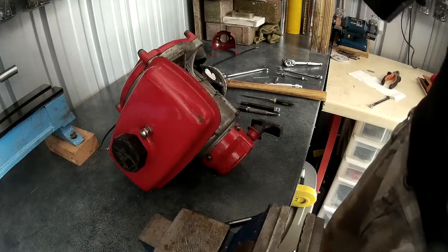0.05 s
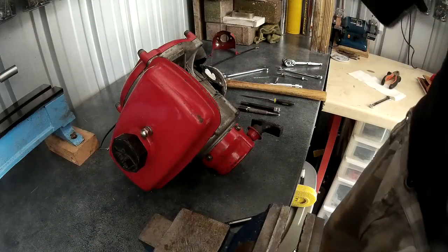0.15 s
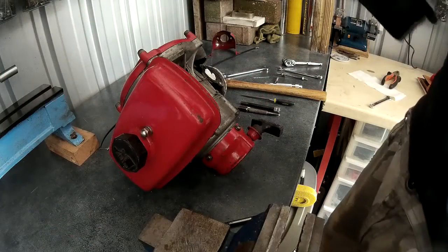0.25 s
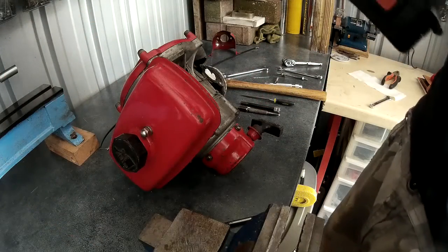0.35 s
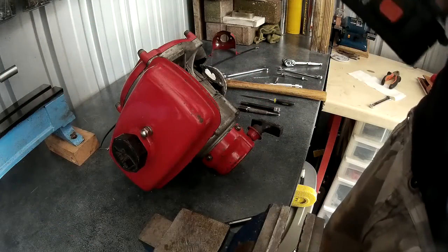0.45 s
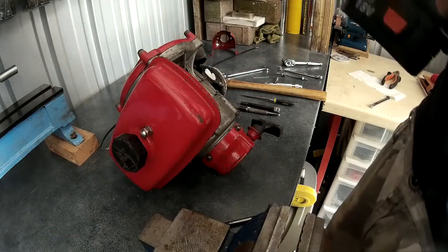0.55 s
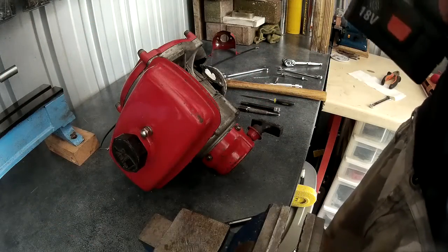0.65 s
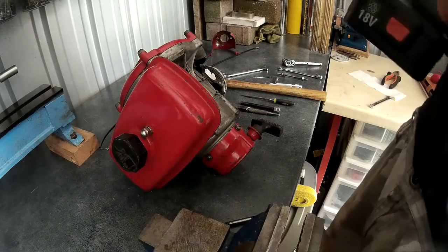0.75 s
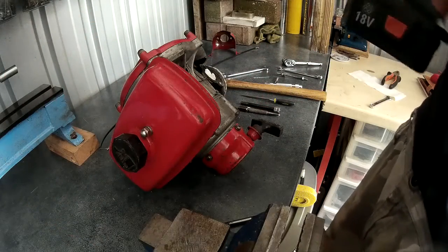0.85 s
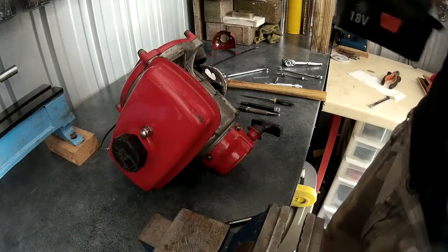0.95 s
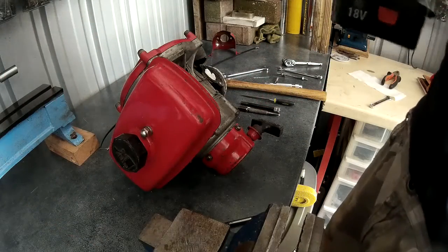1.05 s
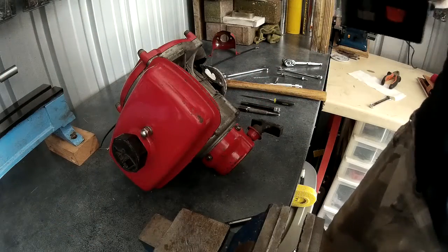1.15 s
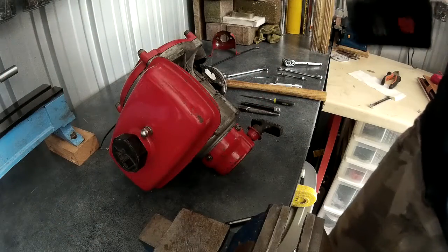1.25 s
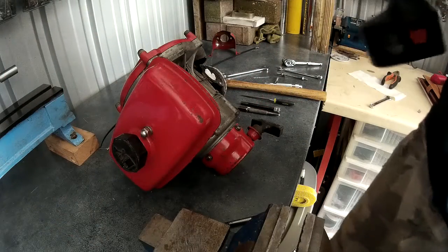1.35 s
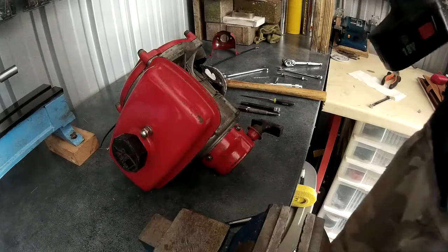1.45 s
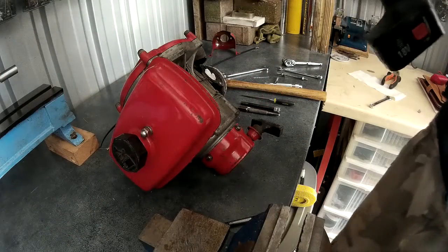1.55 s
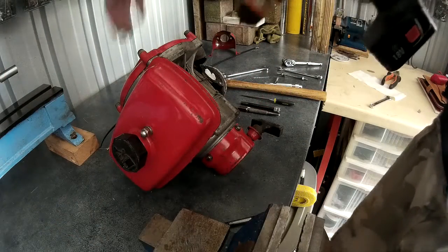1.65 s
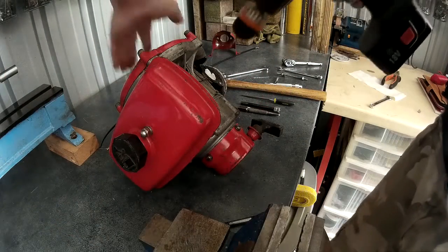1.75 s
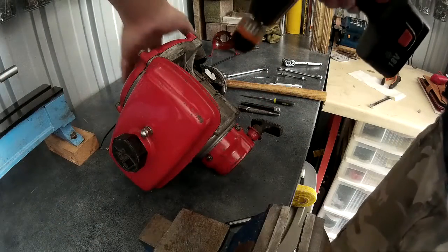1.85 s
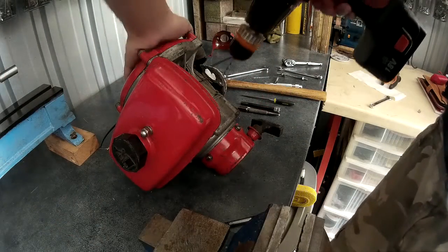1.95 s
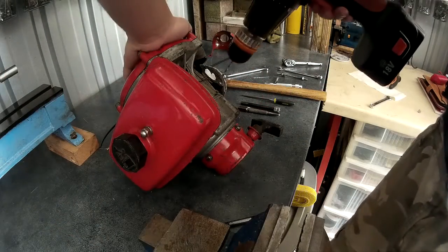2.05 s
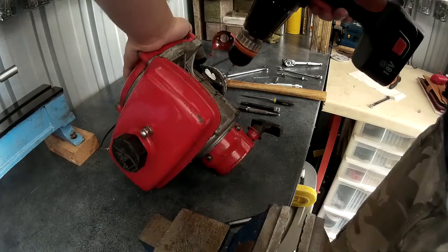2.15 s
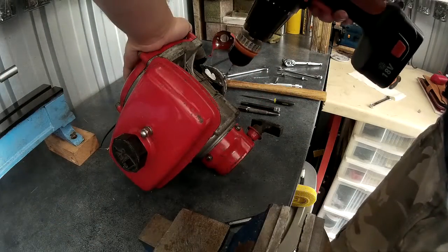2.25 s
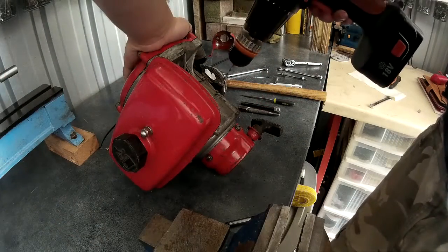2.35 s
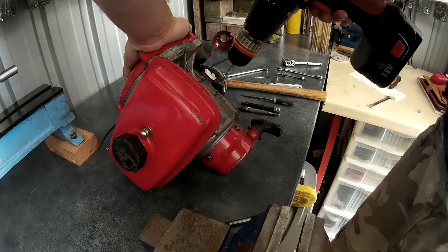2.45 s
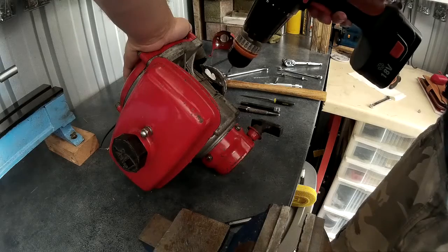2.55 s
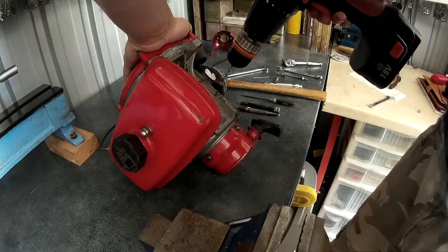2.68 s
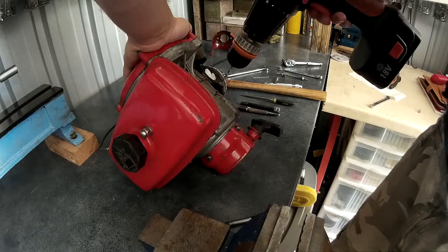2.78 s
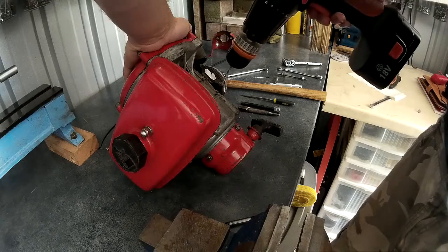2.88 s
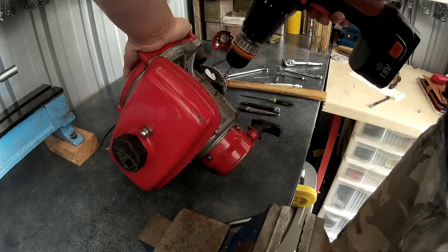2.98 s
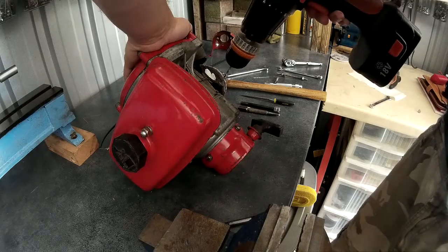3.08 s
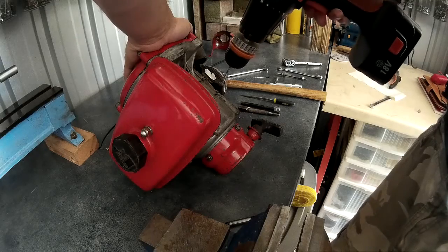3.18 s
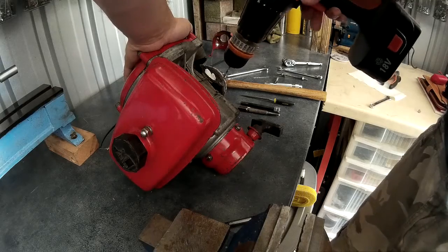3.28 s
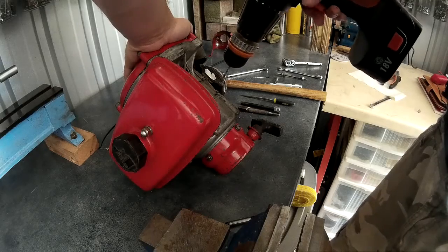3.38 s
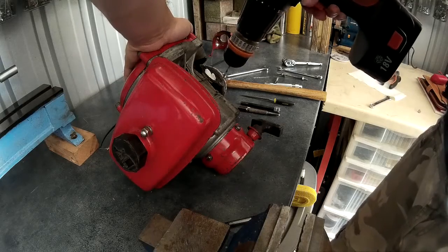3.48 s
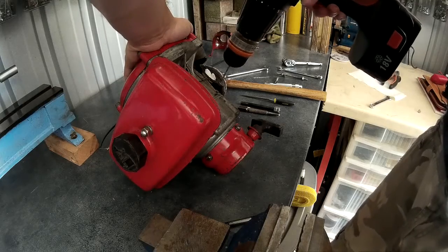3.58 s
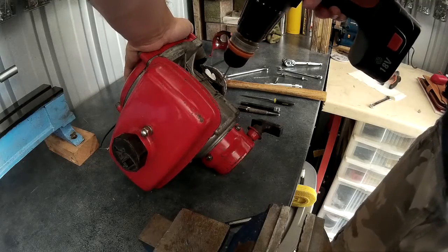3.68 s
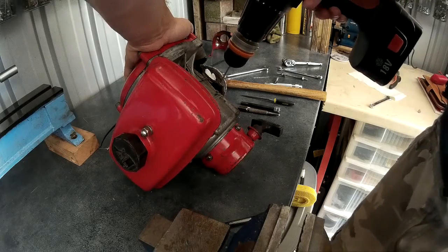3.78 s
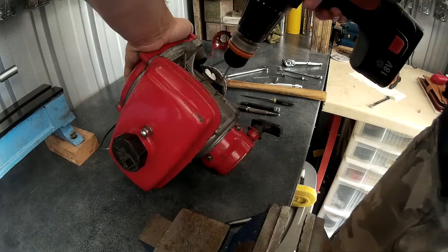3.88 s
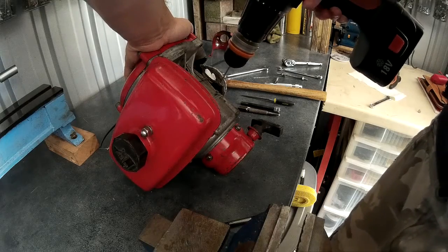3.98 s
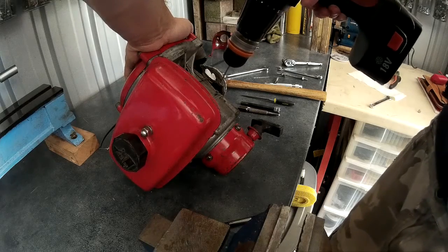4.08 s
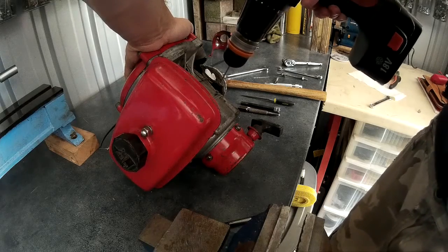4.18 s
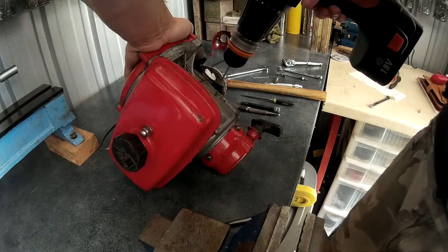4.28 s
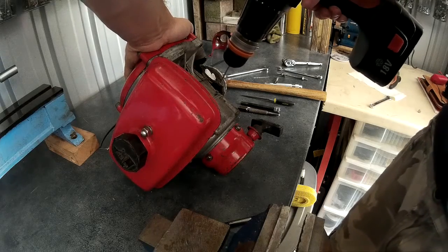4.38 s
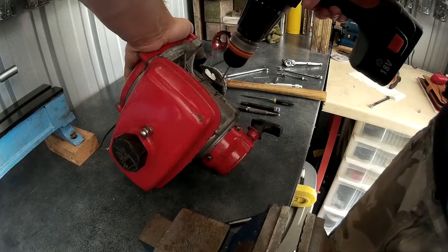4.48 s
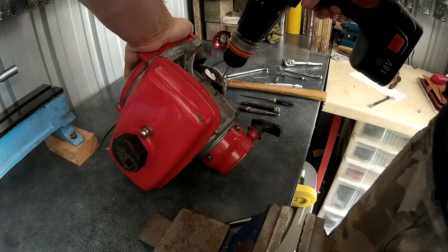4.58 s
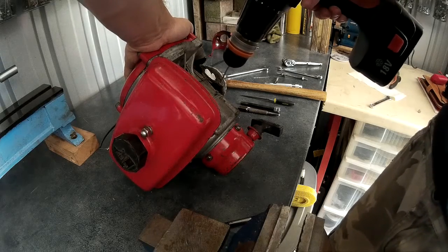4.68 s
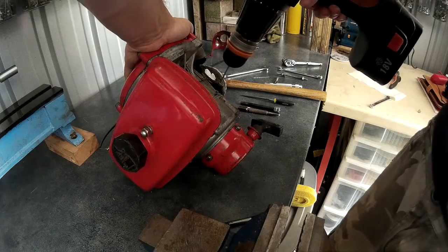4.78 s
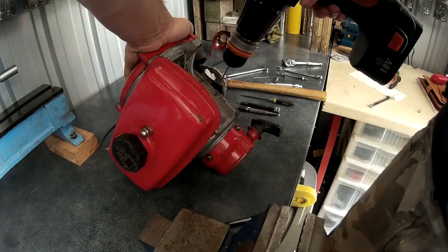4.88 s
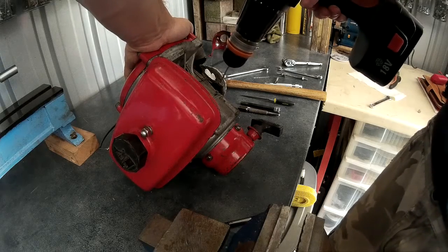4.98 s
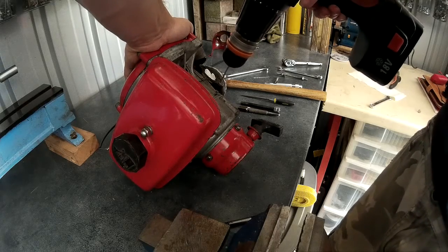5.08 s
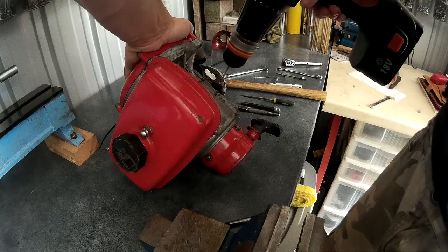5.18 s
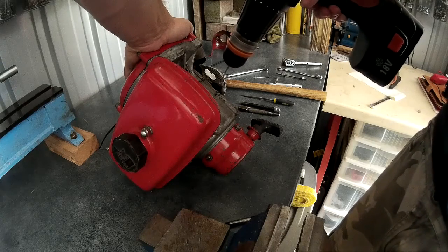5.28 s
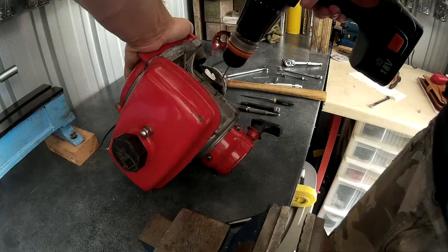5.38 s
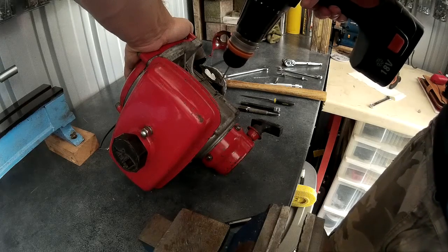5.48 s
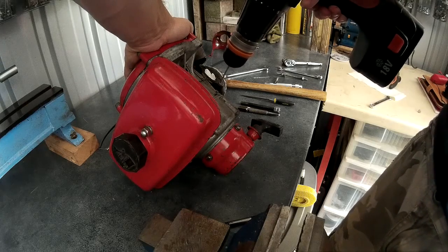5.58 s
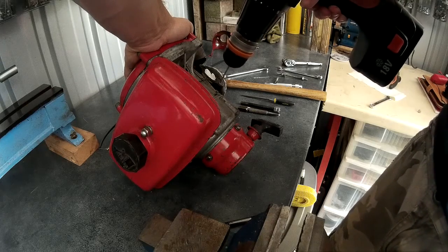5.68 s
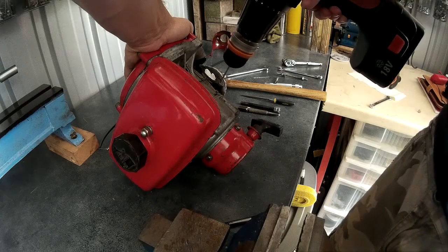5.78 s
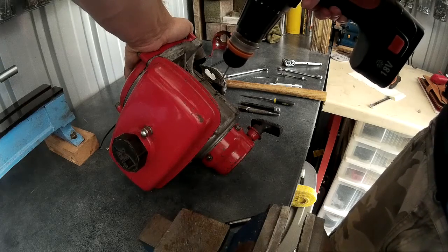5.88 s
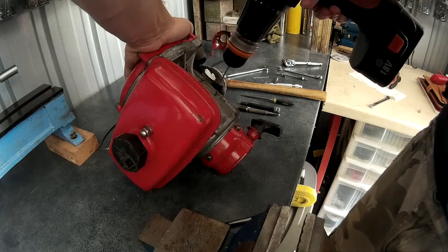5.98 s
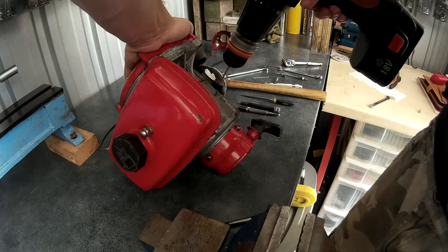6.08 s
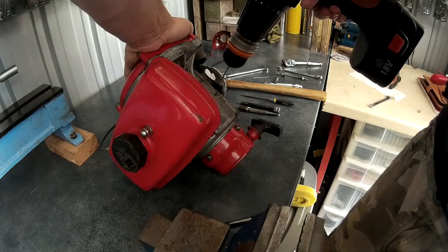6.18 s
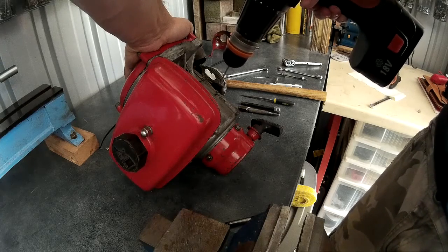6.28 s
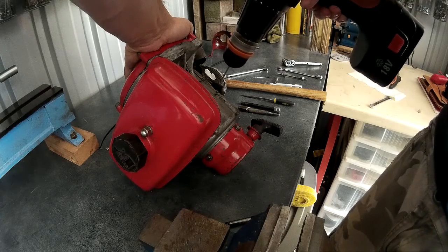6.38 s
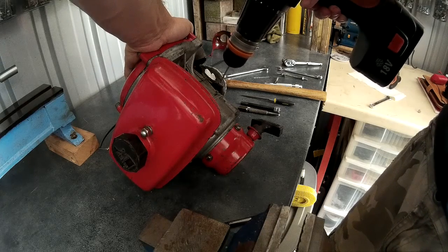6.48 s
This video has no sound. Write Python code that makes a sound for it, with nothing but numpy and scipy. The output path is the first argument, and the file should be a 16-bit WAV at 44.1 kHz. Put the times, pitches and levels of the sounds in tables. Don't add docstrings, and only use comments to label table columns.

```python
import sys
import numpy as np
from scipy import signal
from scipy.fft import rfft, irfft, next_fast_len
from scipy.io import wavfile
from scipy.ndimage import uniform_filter1d, map_coordinates

SR = 44100
rng = np.random.default_rng(int(sys.argv[2]) if len(sys.argv) > 2 else 0)


def nominal_scale(level):
    x = np.asarray(level, float) / 20
    return 10 ** x


def transcribe(signal):
    frames = np.atleast_2d(signal).T
    limited = np.clip(frames, -1, 1)
    pcm = np.round(limited * 32767).astype(np.int16)
    wavfile.write(sys.argv[1], SR, pcm)


N = 288369
TIME = np.arange(N) / SR
TRIGGER_S = 3.535
CRUISE = 13.23


def unit_rms(x):
    return x / np.sqrt(np.mean(x ** 2) + 1e-20)


def coloured(x, points, rings=(), ring_db=0):
    size = next_fast_len(len(x))
    hz = np.fft.rfftfreq(size, 1 / SR)
    point_hz, db = np.transpose(points)
    power = nominal_scale(2 * np.interp(np.log(hz + 1), np.log(point_hz), db, -90, -90))
    for centre, width, top_db in rings:
        power = power + nominal_scale(2 * (top_db + ring_db)) / (1 + (2 * (hz - centre) / width) ** 2) ** 2
    return unit_rms(irfft(rfft(x, size) * np.sqrt(power), size)[:len(x)])


def wander(rate_hz):
    knots = rng.standard_normal(int(N / SR * rate_hz) + 3)
    return map_coordinates(knots, [TIME * rate_hz], order=3)


def add(mix, s, sound):
    part = mix[max(round(s * SR), 0):][:len(sound)]
    part += sound[:len(part)]


def band(x, hz, width):
    shape = signal.iirpeak(np.clip(hz, 50, 15000), max(hz / width, .3), SR)
    once = signal.lfilter(*shape, x)
    return unit_rms(signal.lfilter(*shape, once))


def swell(s, length, rise, fall):
    return np.clip(np.minimum((TIME - s) / rise, (s + length - TIME) / fall), 0, 1)


def worn(turn, share):
    teeth = rng.standard_normal(4096)
    again = teeth[(turn % 1 * len(teeth)).astype(int)]
    return np.sqrt(share) * again + np.sqrt(1 - share) * rng.standard_normal(N)


# time in seconds, speed in turns per second.
SPINDLE_SPEED = [(3.55, 5.0), (3.6, 8.929), (3.65, 11.081), (3.7, 11.917), (3.76, 12.376), (3.9, 13.477),
                 (4.0, 13.531), (4.2, 13.374), (4.4, 13.383), (4.8, 13.221), (5.2, 13.21), (5.5, 13.26),
                 (6.2, 13.22), (6.54, 13.17)]
# time in seconds, load from 0 to 1.
BIT_LOAD = [(3.535, 0.45), (3.95, 0), (4.1, 0.45), (4.35, 0.46), (4.7, 0.66), (4.9, 0.9), (5.15, 0.86),
            (5.4, .85), (5.65, .8), (5.9, 0.83), (6.54, 0.93)]
# level in dB at full speed unloaded, dB gained at full load, power of speed.
MESH_LEVEL = (-22.5, 5.87, 1)
CLATTER_LEVEL = (-30, 2.3, 4.35)
HISS_LEVEL = (-43.5, 1.4, 5.5)


def drill():
    start_s, start_speed = SPINDLE_SPEED[0]
    speed = np.interp(TIME, *np.transpose(SPINDLE_SPEED)) * (TIME > start_s)
    turn = np.cumsum(speed) / SR
    load = np.clip(np.interp(TIME, *np.transpose(BIT_LOAD)), 0, 1)
    light = 1 - load
    slow_db = 20 * np.log10(np.maximum(speed, start_speed) / CRUISE)

    def level_db(law):
        db, load_db, power = law
        return db + load_db * load + power * slow_db

    catch_db = -52 * np.clip(1 - (TIME - TRIGGER_S) / 0.037, 0, 1)
    bite_db = 2.5 * np.exp(-((TIME - 3.735) / .04) ** 2)
    mesh_db = level_db(MESH_LEVEL) + catch_db
    clatter_db = level_db(CLATTER_LEVEL) + bite_db
    hiss_db = level_db(HISS_LEVEL) + 0.63 * bite_db

    heavy = 2 * np.pi * (turn - .528)
    binds = np.tanh(2 * np.cos(heavy - .3))
    drift = np.array([wander(4.01), wander(6.0), wander(7.6), wander(5.5)])
    low = nominal_scale(-1.17 + 2.3 * slow_db) * gear_mesh(speed, heavy, binds, light, drift)
    low = low + nominal_scale(-7.0) * growl(turn, binds)
    low = low + nominal_scale(19.5) * locked_tones(speed, turn, heavy, light, slow_db, drift)
    low = nominal_scale(mesh_db) * low + slack() + groan(turn)
    high = nominal_scale(clatter_db - 1.5) * clatter(turn, heavy) + nominal_scale(hiss_db - 2.0) * hiss(turn, heavy)
    return (low + high) * (TIME > TRIGGER_S) + whistle()


# frequency in Hz, lift in dB.
CASE_LIFT = [(200, -4), (400, -14), (500, -14.5), (600, -1.5), (690, -7), (830, -11), (1000, -14),
             (1250, -17), (2400, -38), (6000, -24)]


def swept_db(k, speed):
    hz, db = np.transpose(CASE_LIFT)
    return np.interp(k * speed, hz, db) - np.interp(k * CRUISE, hz, db)


# multiple of spindle speed, polarity as +1 or -1,
# level in dB, change in dB while the bit runs light.
MESH_MULTIPLE = [41, 44, 45, 46, 47, 48, 50]
MESH_POLARITY = [1, 1, 1, 1, 1, -1, 1]
MESH_TONE_DB = [-8, -1, -3, 0.5, -18, -7, -13.5]
MESH_LIGHT_DB = [-9.5, -12.5, -9, 2.5, -22, -2, -6]


def gear_mesh(speed, heavy, binds, light, drift):
    mesh = np.zeros(N)
    for k, sign, db, light_db in zip(MESH_MULTIPLE, MESH_POLARITY, MESH_TONE_DB, MESH_LIGHT_DB):
        level_db = db + light_db * light + swept_db(k, speed) + .9 * drift[k % 4]
        mesh += sign * nominal_scale(level_db) * np.cos(k * heavy)
    return mesh * nominal_scale(4.0 * light * binds - 2.0 * light)


# frequency in Hz, level in dB per Hz.
GROWL_COLOUR = [(50, -36), (90, -25), (170, -27), (280, -19.5), (400, -13.5), (500, -9), (590, 3.5),
                (680, -4), (760, -1), (850, -9), (1000, -9.5), (1250, -19), (1700, -63)]


def growl(turn, binds):
    noise = coloured(worn(turn, 0.27), GROWL_COLOUR) * nominal_scale(wander(25.0))
    return noise * nominal_scale(5.0 * binds - 2.2)


# multiple of spindle speed, level in dB.
TONE_MULTIPLE = [11, 12, 17, 18, 21, 23, 24, 25, 36, 39, 51, 54, 59, 60, 62, 64, 69, 72, 75, 87, 108, 109,
                 132, 136, 138, 161, 178, 180, 181, 216, 288, 312, 540]
TONE_DB = [-64.5, -58.5, -60, -46.5, -52.5, -51.5, -50.5, -58, -42, -39, -40, -37.5, -39.5, -33.5, -36.5,
           -35.5, -43, -48, -47, -48, -53, -46, -55, -43, -54, -52.5, -53, -46.5, -49.5, -50, -52.5, -66,
           -68.5]


def locked_tones(speed, turn, heavy, light, slow_db, drift):
    shake = turn + .0013 * wander(24.0)
    places = rng.random(len(TONE_MULTIPLE))
    tones = np.zeros(N)
    for j, (k, db, place) in enumerate(zip(TONE_MULTIPLE, TONE_DB, places)):
        level_db = db + swept_db(k, speed) + 3.7 * slow_db - 3.0 * light
        level_db = level_db + 1.8 * drift[j % 4] * (-1) ** (j // 4)
        tones += np.sqrt(2) * nominal_scale(level_db) * np.cos(2 * np.pi * (k * shake + place))
    return tones * (1 + .25 * np.cos(heavy) + .15 * np.cos(6 * heavy))


# frequency in Hz, level in dB per Hz.
CLATTER_COLOUR = [(800, 12), (1250, -3.5), (1500, 2), (2100, 0.5), (2420, -3), (2550, -7.5), (3500, -8.5),
                  (5300, -17.5), (6100, -25.5), (7500, -50)]
# frequency in Hz, width in Hz, level in dB.
SHELL_RINGS = [(1410, 13, -22), (1800, 22, -2), (2184, 98, -8), (2354, 28, 1.5), (2858, 40, -2.5),
               (3310, 42, -47), (3680, 28, -24), (3744, 63, -8.5), (4140, 34, -4.5), (4820, 150, -12),
               (5170, 130, -11), (6200, 57, -34), (6650, 28, -37), (7200, 54, -14), (7900, 67, -19),
               (8900, 280, -32)]


def clatter(turn, heavy):
    noise = coloured(worn(turn, 0.35), CLATTER_COLOUR, SHELL_RINGS, ring_db=4.5)
    return noise * nominal_scale(.5 * np.cos(2 * heavy) - np.cos(heavy) + 0.36 * wander(60.0))


# frequency in Hz, level in dB per Hz.
HISS_COLOUR = [(4000, 4), (5500, 4.5), (6200, -2), (8000, -2.5), (9200, -2.5), (9800, -8.5), (11200, -5),
               (12200, -10.5), (13500, -25)]


def hiss(turn, heavy):
    throb_db = -.9 * np.cos(heavy - .6) + 0.34 * np.cos(2 * heavy)
    return coloured(worn(turn, 0.13), HISS_COLOUR) * nominal_scale(throb_db + 0.21 * wander(80.0))


# time in seconds, peak in dB, ring in Hz, width in seconds.
SLACK_HITS = [
    (3.652, -14.5, 601.6, 0.0086),
    (3.674, -19.5, 653, 0.0075),
]


def slack():
    out = np.zeros(N)
    for s, db, hz, width in SLACK_HITS:
        out += nominal_scale(db) * np.exp(-((TIME - s) / width) ** 2) * np.sin(2 * np.pi * hz * TIME)
    return out


# start in seconds, length in seconds, multiple of spindle speed, level in dB.
GEARBOX_GROAN = (3.585, .1, 26, -44)


def groan(turn):
    start, length, multiple, db = GEARBOX_GROAN
    level = nominal_scale(db + 3.7 * wander(70.0)) * swell(start, length, 0.03, 0.02)
    return level * np.sin(2 * np.pi * multiple * turn)


# start in seconds, length in seconds, start in Hz, end in Hz, level in dB.
BEARING_WHISTLE = (3.7, .75, 11190, 11270, -59)


def whistle():
    start, length, start_hz, end_hz, db = BEARING_WHISTLE
    hz = np.interp(TIME, [start, start + length], [start_hz, end_hz]) + 17.0 * wander(60.0)
    level = np.sqrt(2) * nominal_scale(db + 2.5 * wander(15.0)) * swell(start, length, 0.027, 0.38)
    return level * np.sin(2 * np.pi * np.cumsum(hz) / SR)


# start in seconds, peak in dB, ring of the case in Hz, bright part in dB.
DULL_KNOCKS = [(0.109, -56, 775, -8), (0.203, -44, 736, -13), (0.349, -48, 745, -27),
               (0.404, -39.5, 650, -17.5), (0.517, -37.5, 544, -16), (0.722, -53, 746, -8),
               (0.799, -47, 660, -23), (1.084, -35.5, 690, -18), (1.177, -52, 687, -18),
               (1.197, -26, 698, -24), (1.274, -21, 680, -20.5), (1.405, -39, 630, -19),
               (1.414, -50, 775, -17), (1.449, -42, 770, -19), (1.599, -42.5, 576, -8),
               (2.847, -55, 802, -15), (2.912, -49, 630, -16), (3.092, -46.5, 579, -27),
               (3.264, -23, 662, -20.5), (3.282, -31.5, 700, -21), (3.406, -46, 695, -14),
               (3.491, -49, 657, -18), (3.544, -50, 576, -18)]
# start in seconds, peak in dB, bright part in dB, ring of the part in Hz.
METAL_CLICKS = [
    (0.031, -35.5, -12, 1960),
    (1.243, -25.5, -16.5, 1640),
    (1.294, -43.5, -3, 3500),
    (1.493, -41.5, -6.5, 3160),
    (1.504, -40.5, -1, 2060),
    (1.525, -35.5, -15, 1900),
    (1.549, -41, -9, 2230),
    (1.574, -38.5, -1.5, 1800),
    (3.197, -45.5, -7, 2293),
]
# time in seconds, peak in dB.
CHIP_SNAP = [
    (4.792, -12.5),
]


def knocks():
    out, t = np.zeros(N), np.arange(9000) / SR
    t60 = 0.031
    hits = [(*row, 1900) for row in DULL_KNOCKS]
    hits += [(s, db, 680, part_db, part_hz) for s, db, part_db, part_hz in METAL_CLICKS]
    for s, peak_db, hz, bright_db, bright_hz in hits:
        noise = rng.standard_normal((3, len(t)))
        rise = 1 - np.exp(-t / 0.00093)
        ring = np.sin(2 * np.pi * hz * t)
        ring = ring + .5 * np.sin(2 * np.pi * hz * 1.2 * t) + 0.2 * np.sin(2 * np.pi * hz * 0.833 * t)
        faint = band(noise[0], hz, 240) * nominal_scale(-60 * t / (3.6 * t60))
        ring = 0.94 * ring * nominal_scale(-60 * t / t60) + 0.24 * faint
        tick = band(noise[1], 0.65 * bright_hz, 3000) * nominal_scale(-60 * t / 0.016)
        rattle = band(noise[2], bright_hz, 0.41 * bright_hz) * nominal_scale(-60 * t / (2.44 * t60))
        add(out, s, nominal_scale(peak_db) * rise * (ring + nominal_scale(bright_db) * (1.27 * tick + 0.69 * rattle)))
    for s, peak_db in CHIP_SNAP:
        crack = band(rng.standard_normal(len(t)), 2500, 3500)
        add(out, s - .001, nominal_scale(peak_db - 12.5 - 60 * t / 0.059) * crack)
    return out


# start in seconds, length in seconds, level in dB.
RUB_STROKES = [
    (-.3, 1.34, -60),
    (1.06, 0.31, -50.5),
    (1.2, 0.79, -54.5),
    (2.945, 1.1, -68.5),
]
# frequency in Hz, level in dB per Hz.
RUB_COLOUR = [(250, -5.5), (450, -7), (620, -1), (750, 3.5), (860, -8), (1200, -15), (2200, -19),
              (4000, -24.5)]


def rubs():
    size = nominal_scale(0.7 * np.minimum(rng.exponential(1, N), 5))
    slips = size * rng.standard_normal(N) * (rng.random(N) < 2500 / SR)
    level = sum(nominal_scale(db) * swell(s, length, 0.072, 0.61) for s, length, db in RUB_STROKES)
    return level * coloured(slips, RUB_COLOUR)


# start in seconds, length in seconds, deep part in dB, hollow part in dB.
WEIGHT_SHIFTS = [
    (.49, 0.087, -75, -59),
    (1.496, 0.146, -68, -53),
    (2.58, 0.11, -65, -82),
    (2.71, 0.073, -72, -80),
    (1.081, 0.076, -73, -59),
    (2.866, 0.12, -54.5, -59),
    (2.963, 0.1, -60, -78),
    (3.251, 0.084, -47, -40),
    (3.313, 0.074, -53, -61),
    (3.4, .08, -68, -65),
]


def thumps():
    deep = coloured(rng.standard_normal(N), [(35, -25), (70, -9), (130, -5), (200, -13), (320, -39)])
    hollow = coloured(rng.standard_normal(N), [(120, -15), (220, -8), (320, 0.5), (500, -4), (900, -6)])
    out = np.zeros(N)
    for s, length, deep_db, hollow_db in WEIGHT_SHIFTS:
        out += swell(s, length, 0.02, 0.035) ** 2 * (nominal_scale(deep_db) * deep + nominal_scale(hollow_db) * hollow)
    return out


# start in seconds, length in seconds, start in Hz, end in Hz, level in dB.
BIRD_CHIRPS = [
    (.17, .06, 4660, 4370, -65),
    (.94, .07, 4300, 4600, -68),
    (1.42, .06, 4500, 4600, -65),
    (1.83, .09, 3900, 4400, -69),
    (2.56, .07, 4300, 4700, -70),
    (3.04, .04, 4600, 4600, -80),
    (3.337, .1, 4000, 4460, -65),
]


def birds():
    out = np.zeros(N)
    for s, length, start_hz, end_hz, db in BIRD_CHIRPS:
        count = int(length * SR)
        fuzz_hz = 2600 * uniform_filter1d(rng.standard_normal(6000), 80)[:count]
        hz = np.linspace(start_hz, end_hz, count) + fuzz_hz
        add(out, s, nominal_scale(db) * np.hanning(count) * np.sin(2 * np.pi * np.cumsum(hz) / SR))
    return out


# frequency in Hz, level in dB per Hz.
FLOOR_COLOUR = [(12, -23), (20, -2), (127, -2), (162, -3), (288, -6.5), (432, -10.5), (745, -15),
                (1510, -19), (2150, -20.5), (2530, -22), (4610, -22), (8860, -22.5), (13300, -24)]
# start in seconds, length of the tones in seconds, tones in dB,
# fizz after them in dB.
CARD_WRITES = [
    (-.25, .2, -88, -72),
    (.73, .3, -81, -82),
    (1.72, .22, -79, -76),
    (2.7, .18, -88, -75),
]


def circuits():
    out = nominal_scale(-61.5) * coloured(rng.standard_normal(N), FLOOR_COLOUR)
    out = out + nominal_scale(-86 + 2.5 * wander(3.0)) * np.sin(2 * np.pi * 9560 * TIME)
    tones = np.sin(2 * np.pi * 7000 * TIME) + np.sin(2 * np.pi * 8400 * TIME)
    fizz = band(rng.standard_normal(N), 8250, 900)
    for s, length, tone_db, fizz_db in CARD_WRITES:
        out = out + nominal_scale(tone_db) * tones * swell(s, length, .02, .02)
        out = out + nominal_scale(fizz_db) * fizz * np.exp(-((TIME - s - .27) / 0.13) ** 2)
    return out


def scene():
    return (drill() + knocks() + rubs() + thumps() + birds() + circuits())[None]


def roll_off(x):
    return signal.sosfilt(signal.butter(12, 13470, fs=SR, output="sos"), x)


def record(dry):
    return roll_off(dry)


dry = scene()
out = record(dry)
transcribe(out)
```